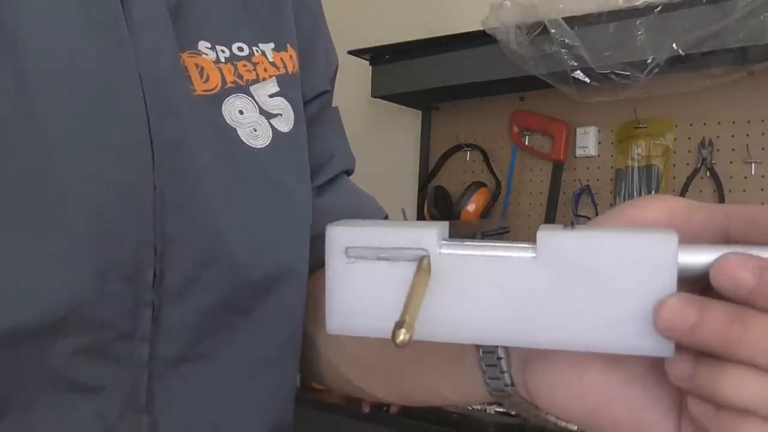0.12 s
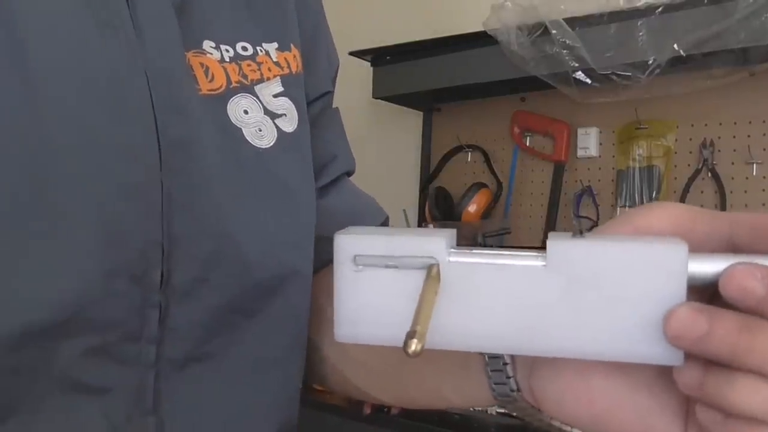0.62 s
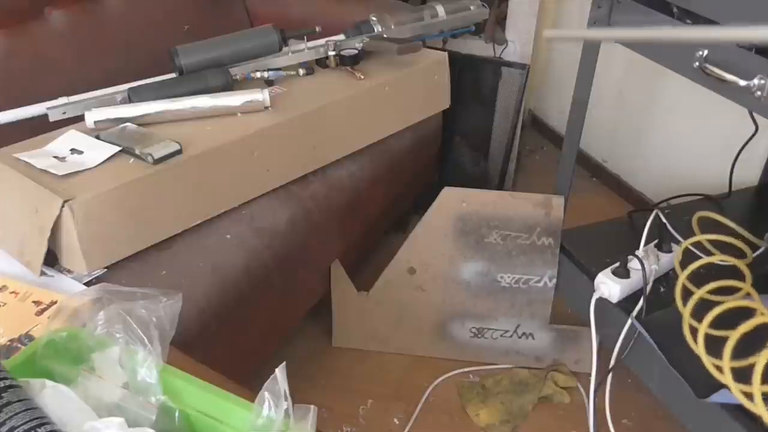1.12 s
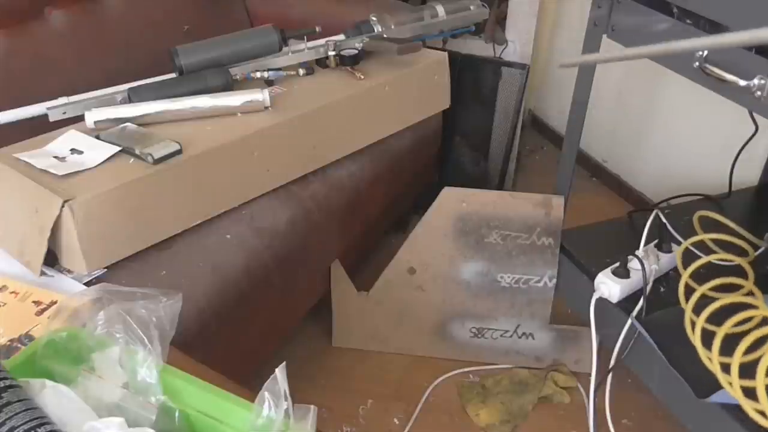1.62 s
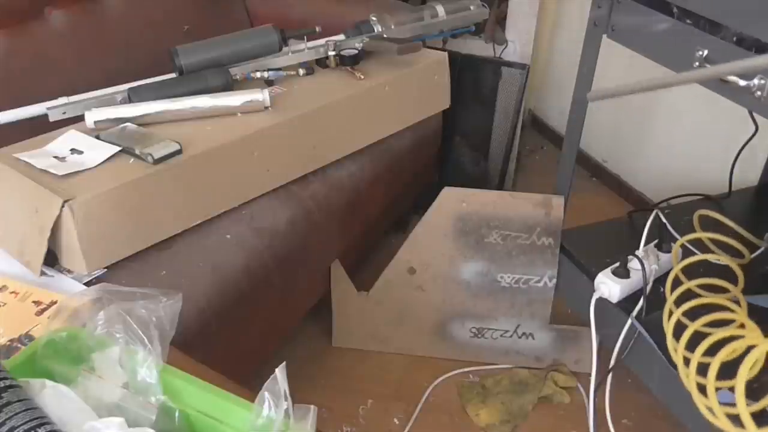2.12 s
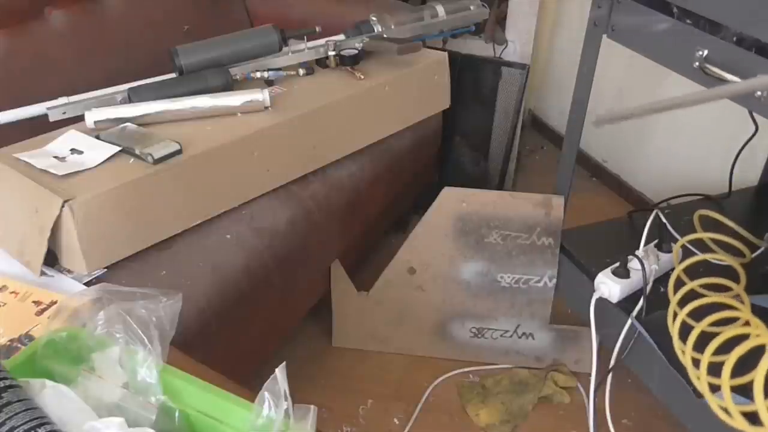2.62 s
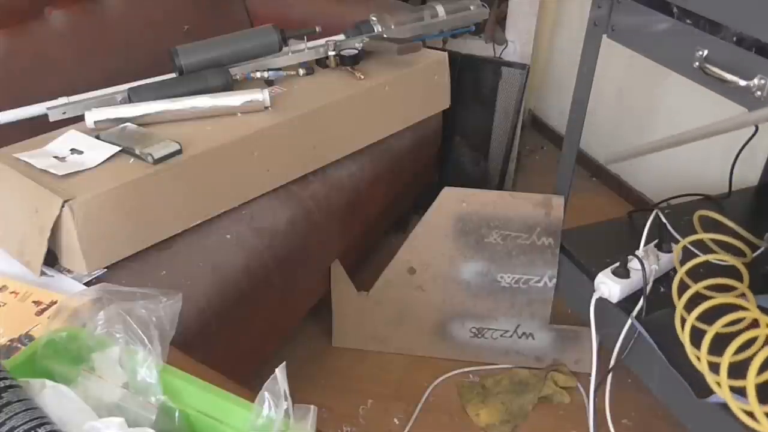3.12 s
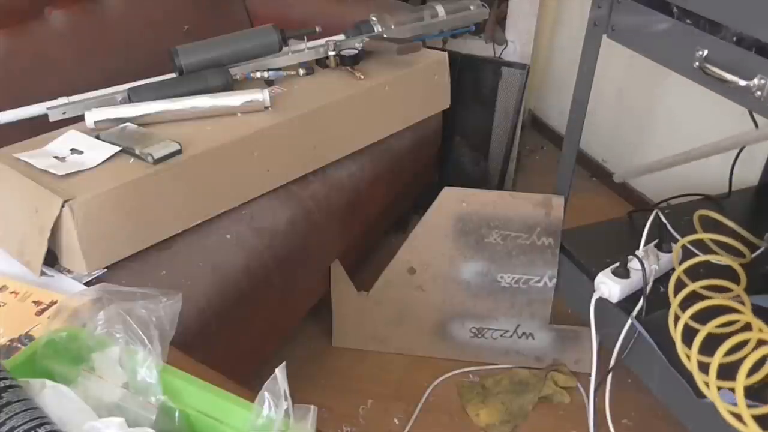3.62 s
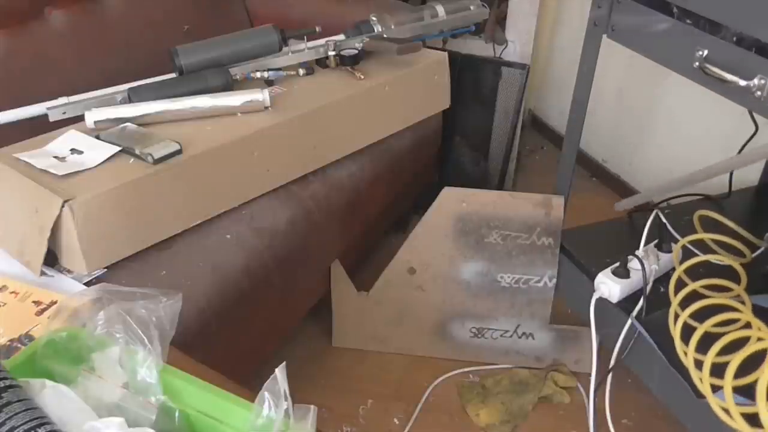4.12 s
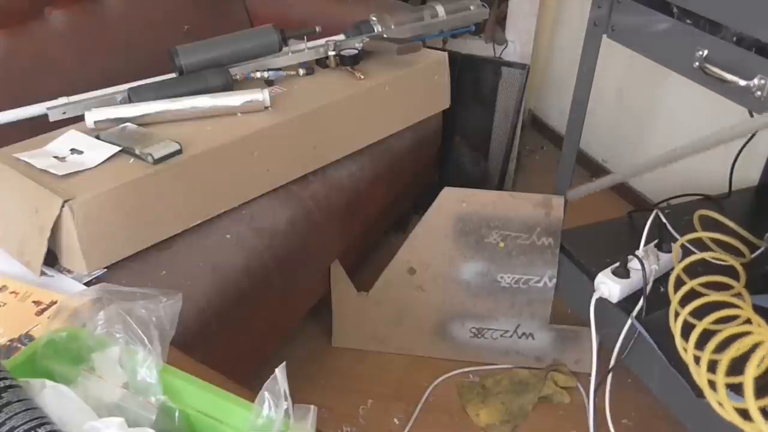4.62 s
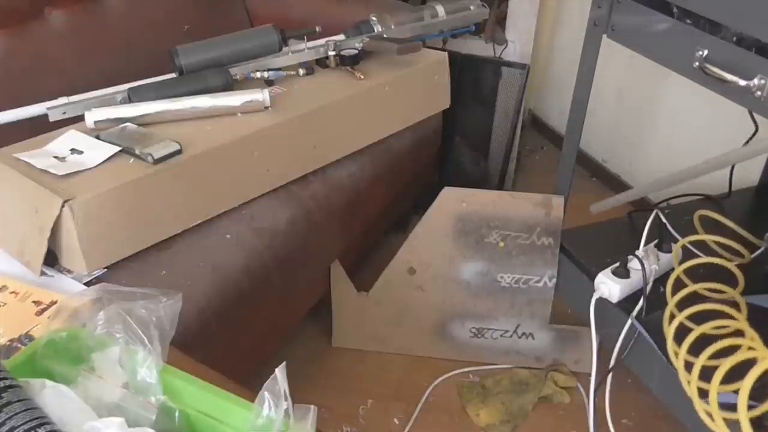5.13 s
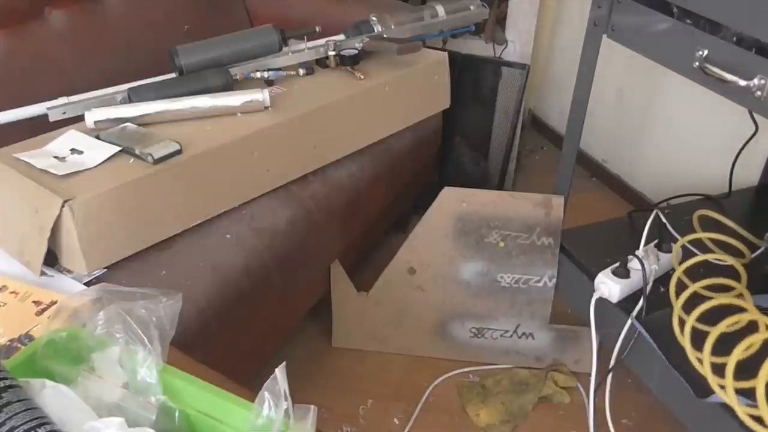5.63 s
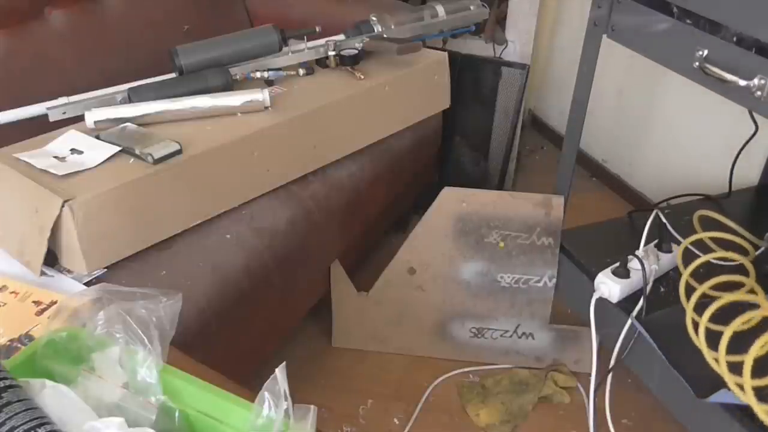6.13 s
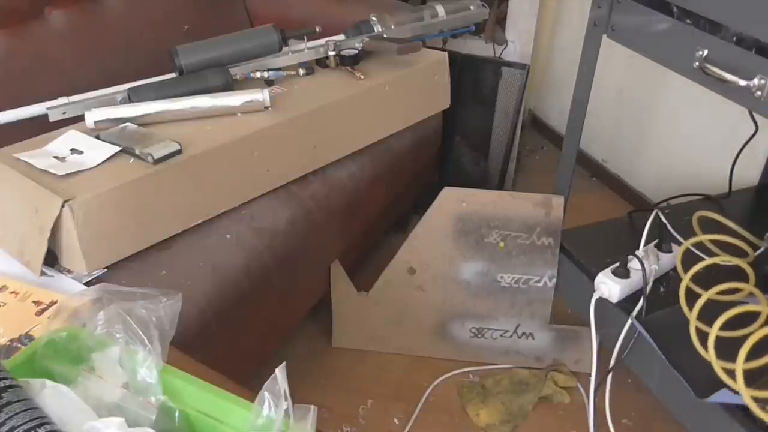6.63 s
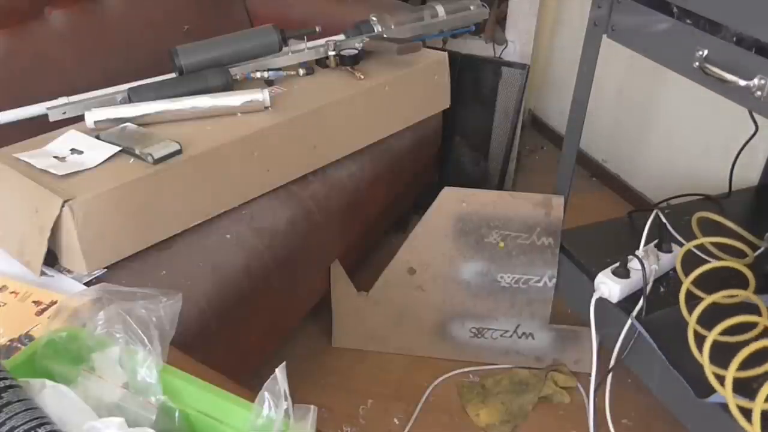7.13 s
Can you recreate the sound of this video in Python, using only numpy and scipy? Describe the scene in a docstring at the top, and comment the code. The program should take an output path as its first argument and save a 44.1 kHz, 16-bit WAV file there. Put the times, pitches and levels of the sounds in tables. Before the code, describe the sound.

Faint room tone with handling and metallic bolt clicks, then a sudden change to a small reverberant workshop. A pressurised air leak fizzes and whistles breathily, growing stronger over several seconds. A weak pop with a cardboard smack is followed quickly by a hard, loud shot and scattering debris. The air sinks sharply and gradually returns, with a couple of light taps. Stereo pickup, with the level ducking after the loud shot.

```python
"""Air leaks from a pressurised home-made gun in a workshop: turbulent noise that swells towards two shots.
Each shot is a short pressure pulse with a hiss, then a strike on cardboard made of damped modes and scatter;
the second dumps the air, which builds again. Before the cut to this bench, hands work the bolt in a quiet
close-up: enveloped noise in the resonances of what is touched. A creak is noise on a gliding pitch, and
a far motor hums in narrow bands. Two partly coherent microphones listen, with a peak-driven gain control."""
import sys
import numpy as np
from scipy import signal
from scipy.fft import rfft, irfft, next_fast_len
from scipy.io import wavfile
from scipy.ndimage import uniform_filter1d, minimum_filter1d

SR = 44100
rng = np.random.default_rng(int(sys.argv[2]) if len(sys.argv) > 2 else 0)


def how_loud(loudness_db):
    """Turn decibels into a plain amplitude multiplier (0 dB gives 1, 20 dB gives 10)."""
    steps = np.asarray(loudness_db, float) / 20
    return 10 ** steps


def to_wav(sig):
    """Store sig (one row per channel, or 1-D mono) as 16-bit WAV at the path in sys.argv[1].

    Samples outside -1..1 are clipped; the rate is SR.
    """
    pcm = np.clip(np.atleast_2d(sig), -1, 1) * 32767
    pcm = np.round(pcm).astype(np.int16)
    wavfile.write(sys.argv[1], SR, pcm.T)  # frames by channels


N = 320254
TIME = np.arange(N) / SR


def along(points, hz):
    """Logarithmic frequency scale: interpolates (f/Hz, value) points on it."""
    f, value = np.transpose(points)
    return np.interp(np.log(hz + 1), np.log(f + 1), value)


def unit(x):
    """Root-mean-square normalisation: scales x to rms 1."""
    return x / np.sqrt(np.mean(x ** 2) + 1e-20)


def curves(rows):
    """Linear interpolation in time: one value per sample for each column after t/s."""
    s, *columns = np.transpose(rows)
    return [np.interp(TIME, s, column) for column in columns]


def filtered(x, response):
    """Linear filtering: the spectrum of x times a response of frequency."""
    size = next_fast_len(x.shape[-1] + 8192)
    spectrum = rfft(x, size) * response(np.fft.rfftfreq(size, 1 / SR))
    return irfft(spectrum, size)[..., :x.shape[-1]]


def band(f, hz, width_hz):
    """Damped resonator: band-pass response with gain 1 at its centre."""
    damping = 1j * f * width_hz
    return damping / (hz * hz - f * f + damping + 1e-9)


def patchy(depth_db):
    """Noise modulation: two independent noises share patches of random gain in time and frequency."""
    z = signal.stft(rng.standard_normal((2, N + SR)), nperseg=512)[2]
    field = uniform_filter1d(rng.standard_normal(z.shape[1:]), size=5, axis=0)
    field = uniform_filter1d(field, size=10, axis=1)
    return signal.istft(z * how_loud(depth_db * unit(field)), nperseg=512)[1][:, :N]


def noise(spectrum, depth_db):
    """Spectral shaping: patchy noise coloured by a relative spectrum, at rms 1."""
    return unit(filtered(patchy(depth_db), lambda hz: how_loud(along(spectrum, hz))))


# air flow at the seal, as level of the jet's fizz: t/s, level/dB
FLOW = [(.79, -40.5), (.95, -51), (1.08, -48.5), (1.2, -42.5), (1.6, -42.5), (2.05, -40.5), (2.6, -38.5),
        (2.8, -37), (3.6, -33.5), (4.2, -33), (4.4, -31.5), (4.61, -32), (4.65, -28.5), (4.7, -34.5),
        (4.95, -41), (5.2, -37), (5.8, -38), (6.3, -36), (6.84, -35), (6.87, -33), (7.26, -34)]
# level of the lower bore band: t/s, level/dB
LOWER_BORE_LEVEL = [(.79, -71), (.95, -57), (1.08, -57), (1.2, -52), (1.8, -46), (2.6, -43.5), (2.8, -37.5),
                    (3.3, -35), (4.2, -35.5), (4.35, -39.5), (4.5, -37.5), (4.65, -36.5), (4.7, -58),
                    (4.95, -45.5), (5.2, -39.5), (5.65, -48)]
# relative spectra of fizz, upper and lower bore band, low rush, and gun turned aside: f/Hz, level/dB
FIZZ = [(3120, -18), (5300, -6.5), (6320, -3), (8610, -2), (9850, -8), (15100, -17), (16000, -47.5)]
UPPER_BORE = [(2500, -24.5), (3300, -0.5), (3800, 0), (4150, 3.5), (4600, 3), (5000, -1), (5450, -15),
              (7000, -5), (12000, -120)]
LOWER_BORE = [(1240, -25.5), (2100, -7.5), (2390, -1.5), (2750, -7), (3090, -0.5), (3400, -2), (4100, -2.5),
              (4500, -8), (5500, -23), (8140, -120)]
RUSH = [(290, -38), (500, -5), (561, -9.5), (697, -6), (911, -5.5), (1380, -1), (2090, -5), (2300, -6.5),
        (2990, -8), (5060, -120)]
TURNED = [(290, -47), (500, -9.5), (698, -9), (807, -8.5), (906, -4.5), (1000, -9), (1280, -3), (1720, -2),
          (2390, -9), (3020, -9.5), (4470, -2), (5800, -4.5), (7980, -0.5), (15100, -13.5), (16000, -38)]


def leak():
    """Turbulent jet noise at the seal: fizz, two bore resonances and a rush; recoloured as the gun turns."""
    (flow_db,), (lower_db,) = curves(FLOW), curves(LOWER_BORE_LEVEL)
    first_shot, second_shot = (shot[0] for shot in SHOTS)
    excess_db = flow_db + 40  # flow relative to -40 dB
    # the upper bore band grows faster than the flow, and is 1 dB louder once the barrel is empty
    upper_db = -43 + 1.51 * excess_db + 1 * (TIME > first_shot)
    # the rush follows the flow, then levels off; it is weaker after the air is dumped
    rush = 1 / np.hypot(1 / how_loud(-38.5 + excess_db), 1 / how_loud(-41.5))
    rush *= how_loud(-2.5 * (TIME > second_shot))
    facing = how_loud(flow_db) * noise(FIZZ, depth_db=1.0)
    facing += how_loud(upper_db) * noise(UPPER_BORE, depth_db=1.0)
    facing += how_loud(lower_db) * noise(LOWER_BORE, depth_db=1.13)
    facing += rush * noise(RUSH, depth_db=0.85)
    aside = how_loud(flow_db + 0.08) * noise(TURNED, depth_db=1.4)
    swing_s, swing_takes_s = 5.61, 0.5
    turn = np.pi / 2 * np.clip((TIME - swing_s) / swing_takes_s, 0, 1)
    return np.cos(turn) * facing + np.sin(turn) * aside


def ring(modes, t):
    """Modal superposition: exponentially decaying sinusoids struck at t = 0."""
    return sum(-how_loud(db - 60 * t / t60) * np.sin(2 * np.pi * hz * t) for hz, db, t60 in modes)


def gust(spectrum, length):
    """Broadband turbulence: coloured noise of rms 1."""
    return unit(filtered(rng.standard_normal(length), lambda hz: how_loud(along(spectrum, hz))))


# relative spectrum of the hiss at the muzzle: f/Hz, level/dB
MUZZLE = [(710, -29), (1200, 0), (2530, -7.5), (2980, -9), (3220, -6.5), (7660, -2.5), (16000, -11)]
# modes of the bench shaken by a shot: f/Hz, level/dB, t60/s
BENCH = [(152.4, -4.5, 0.4), (202, -1.5, 0.24), (285.4, -6.5, 0.276), (358, -4.5, 0.16), (444, -20, 0.21),
         (600, -8, 0.06)]


def muzzle(t, pop_db, pop_hz):
    """Impulsive radiation: a damped pressure pulse and a turbulent hiss, with ringing bench modes."""
    u = pop_hz * t
    cycles = u + 0.38 * (1 - np.exp(-u / 0.048))  # the first half swing is the quickest
    pop = -np.sin(2 * np.pi * cycles) * np.minimum(u / 0.064, 1) * np.exp(-(u / 1.09) ** 2)
    thump_db = -15.2 + 0.25 * pop_db
    thump = np.minimum(t / 0.0011, 1) * ring(BENCH, t)
    hiss_db = -16 + 1.95 * pop_db
    hiss = np.minimum(t / 0.0039, 1) * how_loud(hiss_db - 60 * t / 0.12) * gust(MUZZLE, len(t))
    hiss *= 1 + 0.3 * np.cos(2 * np.pi * 230 * (t - .002))  # the barrel's air column sputters
    return how_loud(pop_db) * pop + how_loud(thump_db) * thump + hiss


# modes of the cardboard box under a pellet: f/Hz, level/dB, t60/s
BOX = [(333, -9.5, 0.011), (750, -18, 0.0032), (1070, 1.5, 0.0063), (1730, -4.5, 0.011)]
# relative spectrum of the scattering air and scraps: f/Hz, level/dB
SCATTER = [(59, -36), (100, -23), (389, 4), (991, -2.5), (1200, -1), (1360, -1.5), (1610, 0.5), (1760, 3),
           (2040, -2), (3250, -15), (4200, -5), (4900, 3), (5600, -2), (9410, -7), (16000, -28.5)]


def impact(t, pop_db, scatter_t60):
    """Impact excitation: the box rings and cracks while air and scraps scatter as decaying noise."""
    strike_db = -6 + 1.88 * pop_db
    scatter_db = -20.5 + 2.63 * pop_db
    crack = 0.21 * how_loud(-60 * t / 0.0059) * rng.standard_normal(len(t))
    scatter = how_loud(scatter_db - 60 * t / scatter_t60) * gust(SCATTER, len(t))
    return how_loud(strike_db) * (ring(BOX, t) + crack) + scatter


# shots: t/s, pop level/dB, pop f/Hz, pellet flight/s, scatter t60/s
SHOTS = [(4.2679, -2, 350, .016, 0.13), (4.6498, 7.5, 670, .0195, 0.34)]


def shots():
    """Propagation delay: each pellet strikes one flight time after the pop, and a wall echoes both."""
    x, t = np.zeros(N + SR), np.arange(SR // 2) / SR
    for s, pop_db, pop_hz, flight, scatter_t60 in SHOTS:
        x[round(s * SR):][:len(t)] += muzzle(t, pop_db, pop_hz)
        x[round((s + flight) * SR):][:len(t)] += impact(t, pop_db, scatter_t60)
    delay = round(.008 * SR)  # the nearest wall sends one clear echo
    return x[:N] + how_loud(-18) * np.pad(x, (delay, 0))[:N]


def contact_noise(contacts):
    """Resonant friction and impact: noise passed three times through a resonator swells and dies."""
    x, t = np.zeros(N + 2 * SR), np.arange(SR // 2) / SR
    for s, db, hz, width_hz, rise, t60 in contacts:
        grit = filtered(rng.standard_normal(2 * len(t)), lambda f: band(f, hz, width_hz) ** 3)
        grit = unit(grit[len(t):])  # the resonator has settled
        shape = np.minimum(t / rise, 1) ** 2 * how_loud(-60 * np.maximum(t - rise, 0) / t60)
        x[round((s + 1) * SR):][:len(t)] += how_loud(db) * shape * grit  # 1 s of lead-in
    return x[SR:SR + N]


def struck(hits, body, rise):
    """Modal excitation: every hit excites all resonances of the body."""
    return [(s, db + level, hz, width, rise, t60) for s, db in hits for hz, width, level, t60 in body]


# hits of the bolt on its stop, rattles of its handle, hollow clacks at the bench: t/s, level/dB
BOLT_HITS = [(.289, -44.5), (.588, -52), (.613, -57), (.6365, -34), (.64, -28)]
RATTLES = [(.309, -45.5)]
CLACKS = [(.789, -27)]
# the bodies of bolt, handle and clack: f/Hz, width of one resonator pass/Hz, level/dB, t60/s
BOLT = [(5470, 8300, -1, 0.016), (500, 2000, -2.5, 0.036), (100, 150, -6.5, 0.099)]
HANDLE = [(4000, 300, -1.5, .05), (1450, 1100, 1, 0.034), (5460, 500, -3, .04)]
HOLLOW = [(1340, 330, -0.5, 0.18), (670, 900, -4.5, 0.31), (1820, 470, -9, .23)]
# a fading air hiss at the start, then fingers rubbing on plastic: t/s, level/dB, t60/s
HISSES_AND_RUBS = [(-.02, -55, 0.96), (0.295, -44, 0.11), (.391, -54.5, 0.21), (.49, -57.5, 0.17)]
# soft dull bumps: t/s, level/dB, f/Hz
BUMPS = [(1.679, -41, 1190), (2.306, -43, 500), (2.691, -44, 410)]
# bright taps, then faint narrow rings: t/s, level/dB, f/Hz, t60/s
TAPS = [(5.946, -31.5, 6140, 0.12), (6.13, -38, 1980, .033)]
RINGS = [(1.43, -46.5, 208, 0.49), (5.08, -49, 1096, 1.7), (5.1, -41, 3770, 0.74), (5.619, -41, 362, 0.2)]


def hands():
    """Source-filter principle: each contact excites the resonances of what is touched."""
    contacts = struck(BOLT_HITS, BOLT, rise=.0012)
    contacts += struck(RATTLES, HANDLE, rise=0.0089)
    contacts += struck(CLACKS, HOLLOW, rise=0.0014)
    # t/s, level/dB, f/Hz, width of one resonator pass/Hz, rise/s, t60/s
    contacts += [(s, db, 5560, 12000, 0.018, t60) for s, db, t60 in HISSES_AND_RUBS]
    contacts += [(s, db, hz, 420, 0.011, 0.27) for s, db, hz in BUMPS]
    contacts += [(s, db, hz, 4300, 0.0054, t60) for s, db, hz, t60 in TAPS]
    contacts += [(s, db, hz, 70, .013, t60) for s, db, hz, t60 in RINGS]
    return contact_noise(contacts)


# a rough rising creak: t/s, pitch f/Hz, level of the first partial/dB
CREAK = [(2.04, 424, -54), (2.063, 437, -47), (2.085, 456.5, -47), (2.115, 525, -37), (2.128, 545, -40),
         (2.138, 838, -40.5), (2.16, 884, -35), (2.24, 876, -62)]


def creak():
    """Stick-slip friction: uneven slipping makes two narrow bands of noise riding on a gliding pitch."""
    hz, first_db = curves(CREAK)
    # the second partial gains 13.5 dB per octave as the pitch climbs
    second_db = first_db - 10 + 13.5 * np.log2(hz / 500)
    phase = 2 * np.pi * np.cumsum(hz) / SR
    slow = filtered(rng.standard_normal((2, N)), lambda f: 1 / (1 + (f / 70) ** 2))
    rough = .8 + .7 * unit(slow)
    moving = (TIME > CREAK[0][0]) & (TIME < CREAK[-1][0])
    first = how_loud(first_db) * rough[0] * np.sin(phase)
    second = how_loud(second_db) * rough[1] * np.sin(2 * phase)
    return moving * (first + second)


# motor hum as narrow bands: f/Hz, width of one resonator pass/Hz, level/dB
HUM = [(76.3, 4, -70), (99.9, 5.2, -69), (208, 5.3, -63.5), (410, 7, -63), (431, 3.8, -64.5)]


def motor():
    """Narrow-band noise: sharp resonances, each applied twice, give a hum that wavers in level."""
    hum = np.zeros((2, N))
    for hz, width_hz, db in HUM:
        hum += how_loud(db) * unit(filtered(rng.standard_normal((2, N)), lambda f: band(f, hz, width_hz) ** 2))
    return hum


# relative spectrum of the building's rumble: f/Hz, level/dB
RUMBLE = [(24, -57), (40, -6), (81, -17), (119, -9.5), (356, -2.5), (427, -0.5), (600, -14.5), (780, -4),
          (1320, -120)]


def rumble():
    """Diffuse background noise: the steady low rumble of the building."""
    return how_loud(-56) * noise(RUMBLE, depth_db=0.5)


# relative spectrum of the close-up's room tone: f/Hz, level/dB
QUIET = [(24, -37), (40, 3), (91, -6), (160, -9), (210, 4), (260, -5), (329, -5), (516, -4), (663, -6),
         (733, -4.5), (2700, -18), (4000, -20), (4750, -16), (5500, -21.5), (16000, -29)]


def room_tone(end_s):
    """Stationary coloured noise: the close-up's room tone fades to a faint remainder by end_s."""
    fade_s = .012
    fade = np.clip((end_s - TIME) / fade_s, .03, 1)
    return how_loud(-52.7) * fade * noise(QUIET, depth_db=0.5)


# reverberation of the workshop: f/Hz, t60/s
WALLS = [(100, 0.6), (1000, 0.49), (6000, 0.32), (14000, 0.096)]


def walls(x):
    """Statistical reverberation: convolution with noise that decays at its own rate at each frequency."""
    hz, t, z = signal.stft(rng.standard_normal((2, SR)), SR, nperseg=256)
    decay = how_loud(-60 * t / along(WALLS, hz)[:, None])
    tail = signal.istft(z * decay, SR, nperseg=256)[1]
    late = np.pad(x, (220, 0))[None]  # 5 ms before the tail begins
    return signal.fftconvolve(late, tail / np.linalg.norm(tail[0]), axes=1)[:, :N]


# likeness of the two microphones: f/Hz, coherence
ALIKE = [(60, 0.69), (130, 0.1), (290, 0.76), (640, 0.8), (1410, 0.74), (3100, 0.64), (6820, 0.82),
         (15000, 0.03)]


def alike(pair):
    """Spatial coherence: two unrelated sounds are mixed to the likeness of the microphones."""
    def mid_side(hz):
        turn = np.arccos(np.clip(along(ALIKE, hz), 0, 1)) / 2
        return np.array([np.cos(turn), np.sin(turn)])
    mid, side = filtered(pair, mid_side)
    return np.array([mid + side, mid - side])


# balance of the microphones: f/Hz, left minus right level/dB
LEAN = [(60, -4), (120, 1), (240, -1), (480, -1.5), (950, -3), (1890, -3.5), (3770, -4.5), (7520, -1),
        (15000, -5)]
# lead of the left microphone: f/Hz, phase/rad
LEAD = [(100, 0), (300, -.25), (8000, -.25), (10500, -1.8), (16000, -1.8)]


def lean(pair):
    """Interchannel level and phase difference: half is given to each microphone, with opposite sign."""
    def left_right(hz):
        half = how_loud(along(LEAN, hz) / 2) * np.exp(1j * along(LEAD, hz) / 2)
        return np.array([half, 1 / half])
    return filtered(pair, left_right)


def scene():
    """Superposition of direct and reverberant sound: the close-up until the cut, then the bench."""
    cut_s, gap_s = .79, .011  # the room tone has faded a gap before the cut
    after = np.arange(N) >= cut_s * SR
    bang, touch, air = shots(), hands() + creak(), leak()
    thin = filtered(bang, lambda hz: 1j * hz / (250 + 1j * hz))  # light walls return little bass
    bench = air + how_loud(-10.5) * walls(air[0]) + rumble() + motor()
    bench += how_loud(-10) * walls(touch * after)
    bench = lean(alike(bench) + touch + bang + how_loud(-9.5) * walls(thin))
    close = room_tone(cut_s - gap_s) + touch * how_loud([[-.6], [.6]])  # touch is louder on the right
    return np.where(after, bench, close)


def band_limit(x):
    """A steep low-pass at the top of the band."""
    return signal.sosfilt(signal.butter(12, 16930, fs=SR, output="sos"), x)


def record(dry):
    """Peak limiting: gain drops just ahead of a peak over the limit, holds, then climbs at a steady rate."""
    # small microphones lose the deep bass
    dry = signal.sosfilt(signal.butter(2, 110, 'high', fs=SR, output='sos'), dry)
    dry = filtered(dry, lambda hz: hz < 16300)
    limit_db, hold_s, climb_db_per_s = -2.5, .3, 18
    over = np.maximum(20 * np.log10(np.abs(dry).max(0) + 1e-9) - limit_db, 0)
    n, ahead = round(hold_s * SR), 64  # samples
    # running maximum of the excess over the hold time, looking slightly ahead
    padded = np.pad(over, (n, ahead))
    held = -minimum_filter1d(-padded, 2 * (n // 2) + 1, origin=n // 2)[n + ahead:]
    ramp = climb_db_per_s * TIME
    drop_db = uniform_filter1d(np.maximum.accumulate(held + ramp) - ramp, ahead)
    return band_limit(dry * how_loud(-drop_db))


dry = scene()
out = record(dry)
to_wav(out)
```